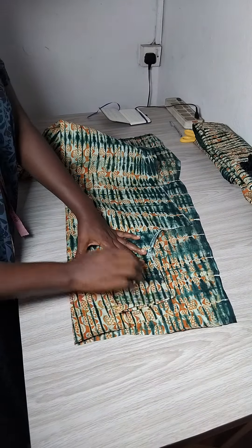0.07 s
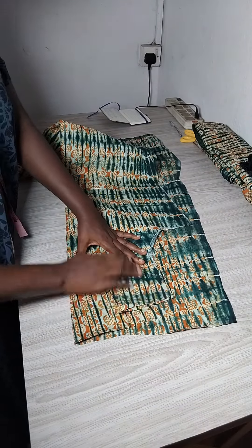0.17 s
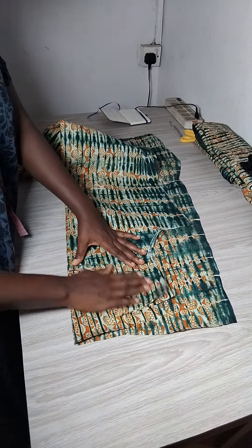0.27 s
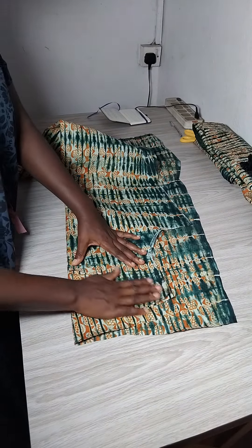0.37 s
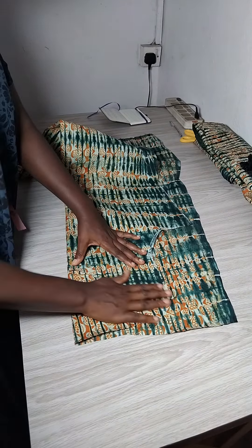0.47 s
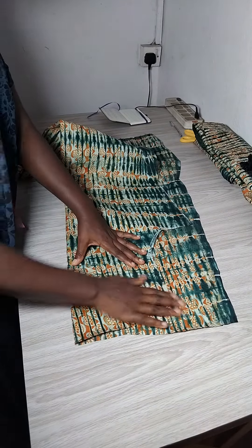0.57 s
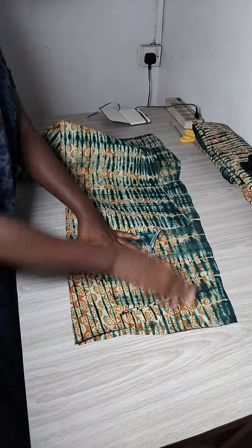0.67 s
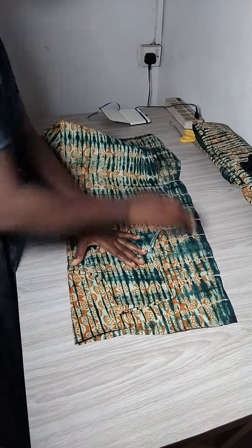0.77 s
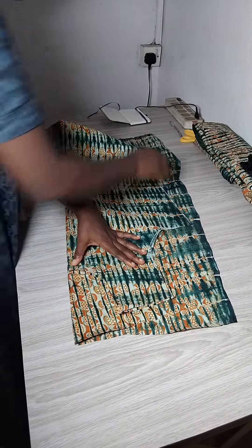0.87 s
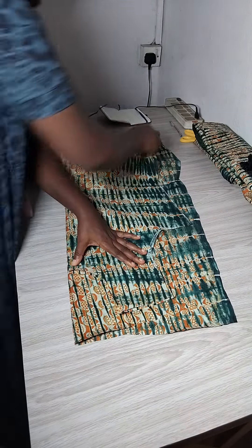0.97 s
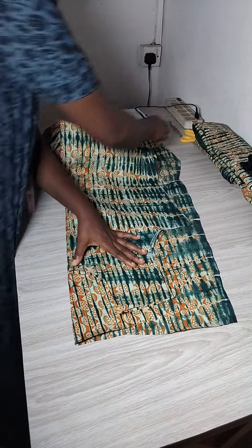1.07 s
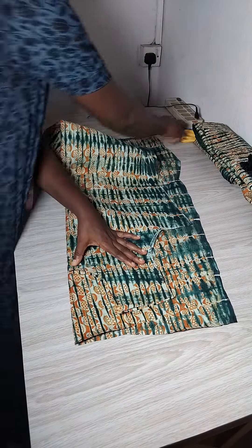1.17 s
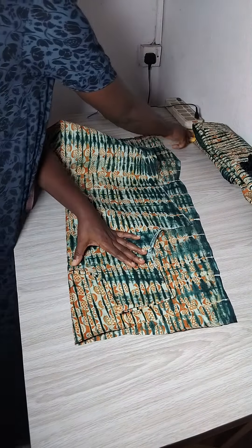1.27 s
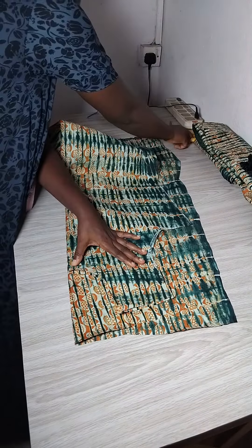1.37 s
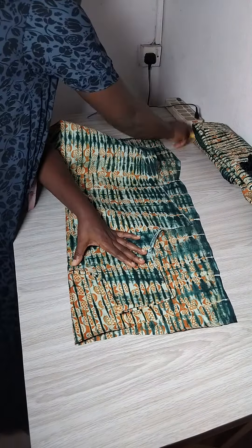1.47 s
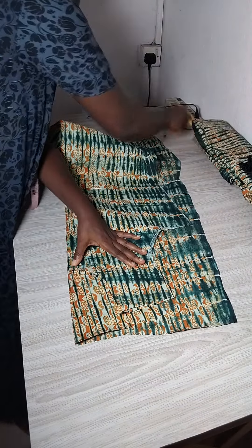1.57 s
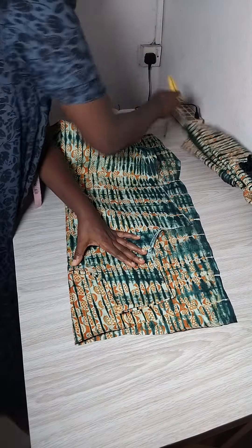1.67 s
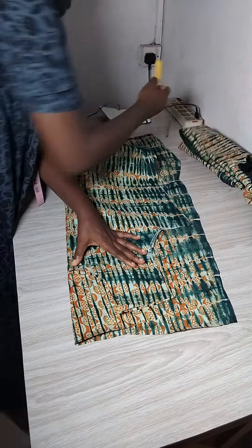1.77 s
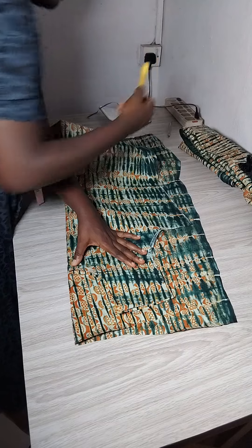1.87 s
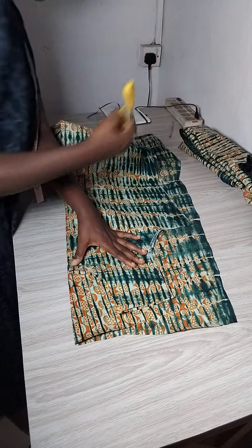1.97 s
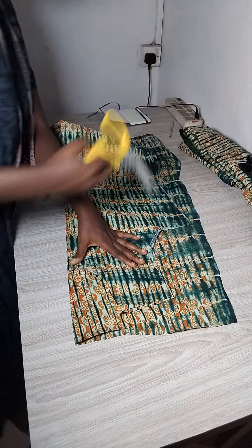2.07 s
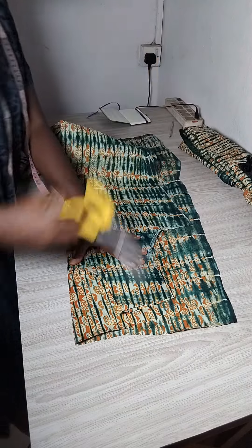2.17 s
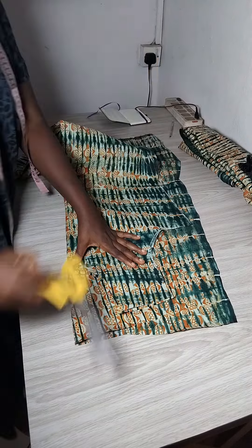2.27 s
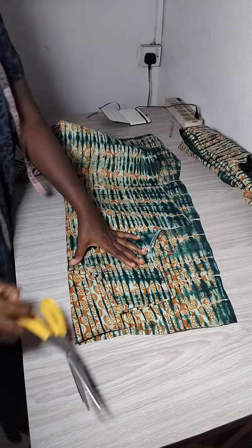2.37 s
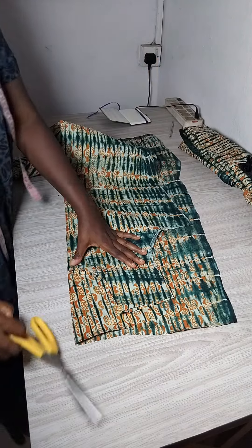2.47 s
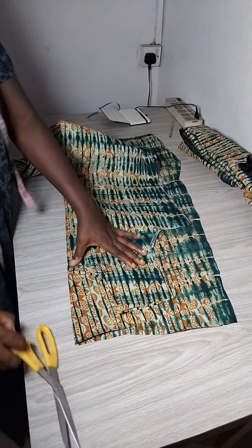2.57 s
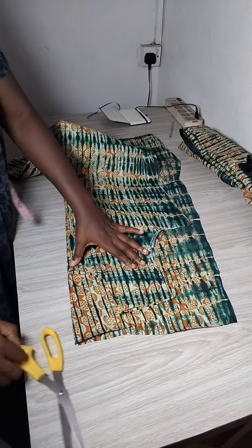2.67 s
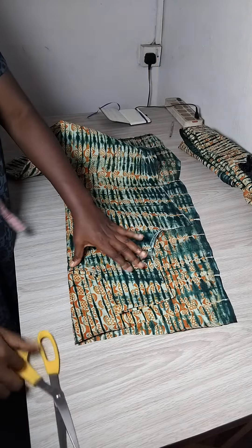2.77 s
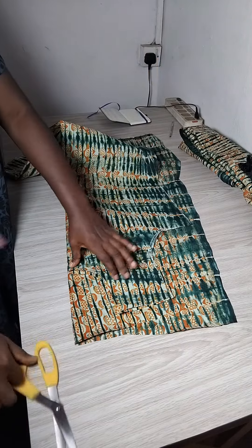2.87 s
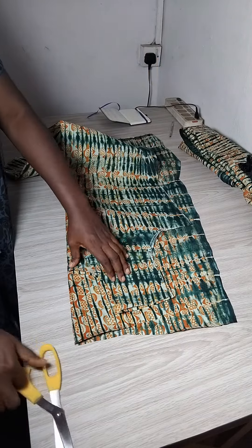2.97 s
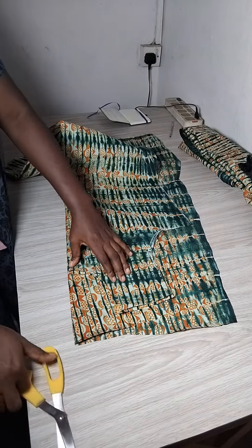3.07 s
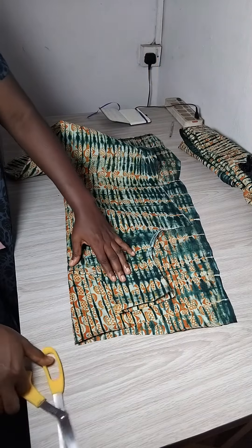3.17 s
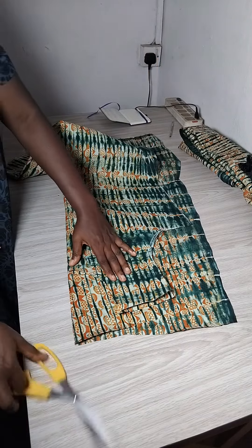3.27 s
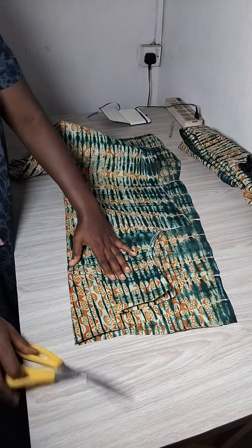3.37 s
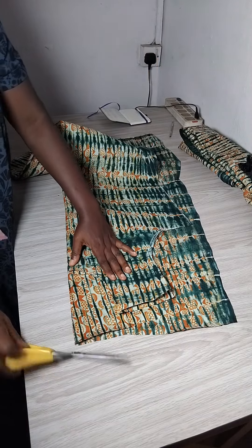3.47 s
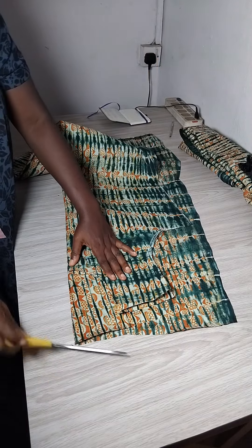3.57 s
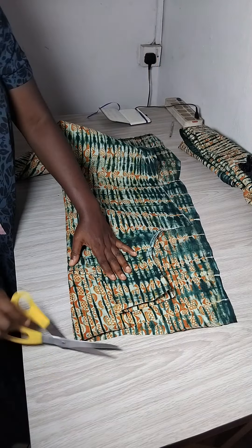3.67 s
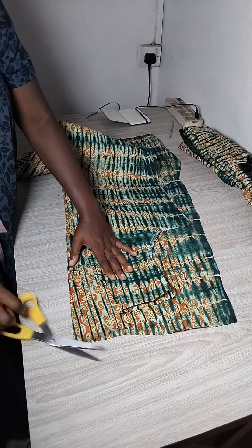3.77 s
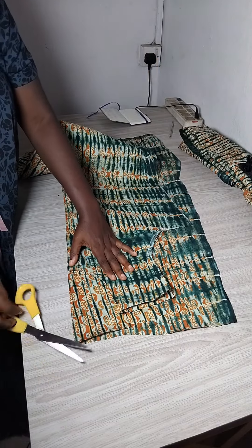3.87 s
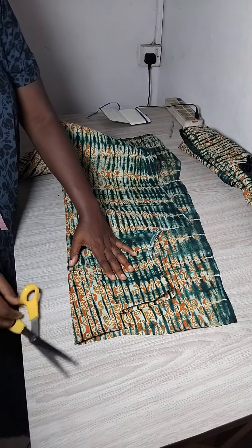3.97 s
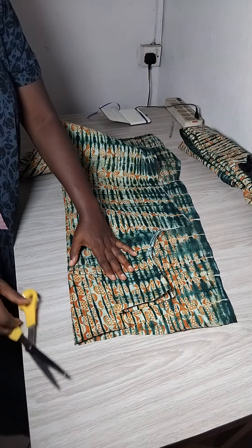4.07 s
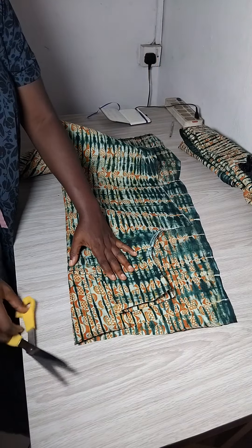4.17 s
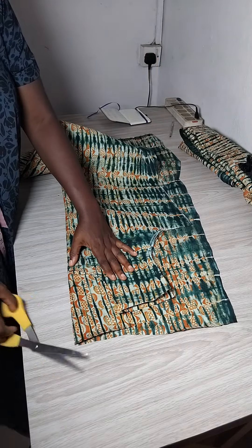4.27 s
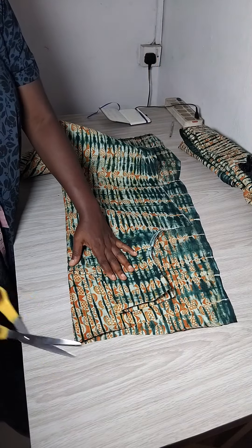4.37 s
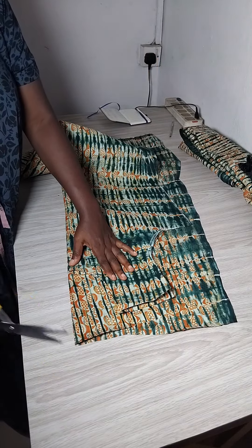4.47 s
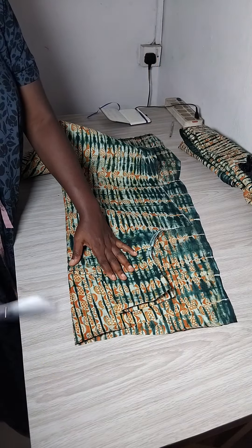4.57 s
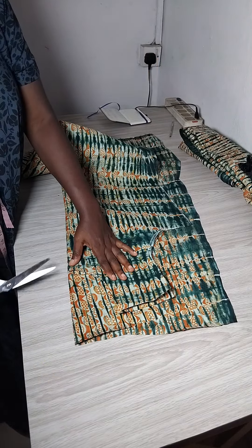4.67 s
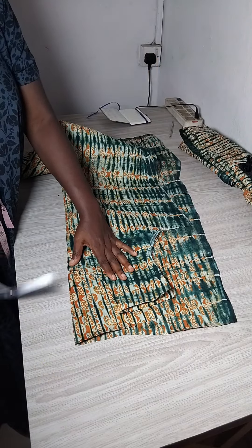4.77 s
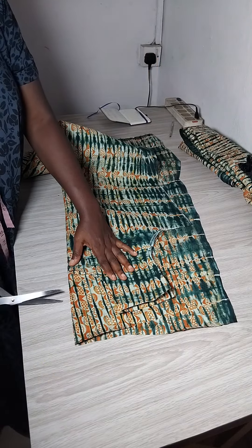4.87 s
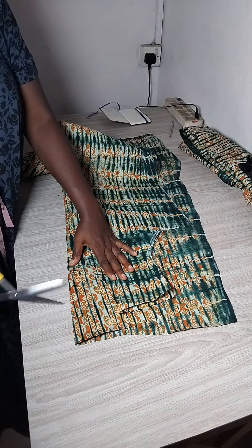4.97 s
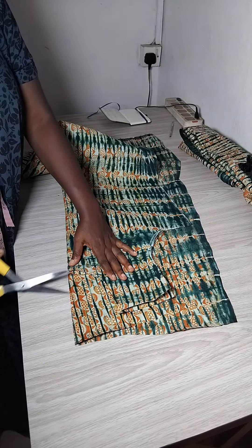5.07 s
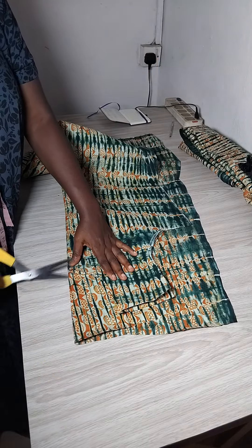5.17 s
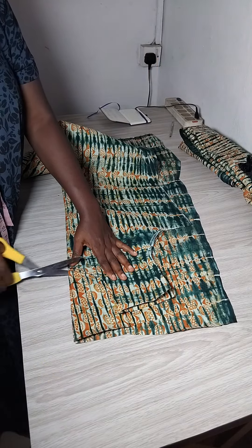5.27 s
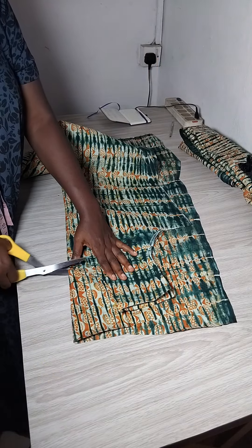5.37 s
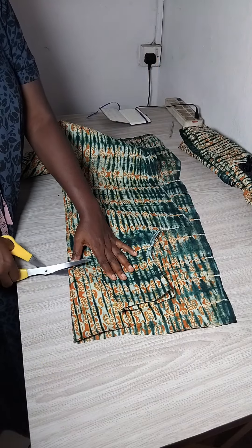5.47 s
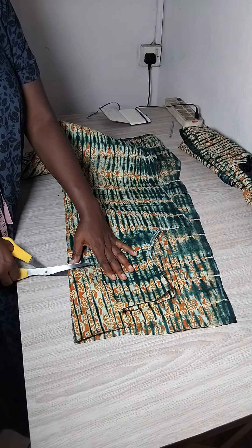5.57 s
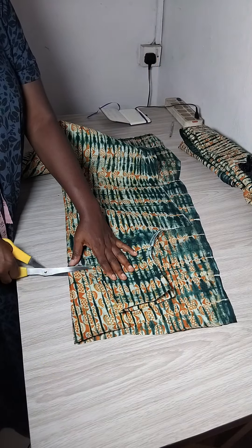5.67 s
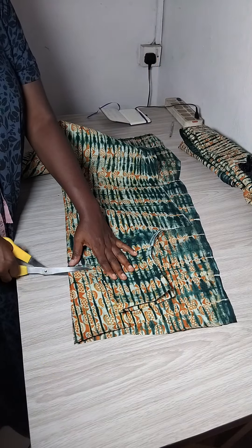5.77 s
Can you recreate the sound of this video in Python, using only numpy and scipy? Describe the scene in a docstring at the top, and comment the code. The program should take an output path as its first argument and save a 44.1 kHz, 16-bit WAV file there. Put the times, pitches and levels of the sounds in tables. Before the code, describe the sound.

A palm softly brushes cloth on a table, then large scissors are picked up with a light scrape, small knocks and a bright clink. After a quiet gap, steel blades snap loudly in irregular snips, with plastic handle clacks and thin metallic rasps. Small bare room, short boomy echo, low rumble; fairly close mono microphone.

```python
"""Small bare room: a hand smooths printed cloth on a table, picks up tailor's scissors, works them open and shut.
Steel blades click (contact noise + ringing modes) and rasp along each other (random slips driving modes).
Plastic handles knock at listed moments as the scissors are handled, opened and shut (thud + clack + low room mode).
The walls answer every snip with a short, boomy echo; cloth rubs as shaped noise over a low rumble."""
import sys
import numpy as np
from scipy import signal
from scipy.fft import rfft, irfft, next_fast_len
from scipy.io import wavfile
from scipy.ndimage import uniform_filter1d, map_coordinates

SR = 44100
rng = np.random.default_rng(int(sys.argv[2]) if len(sys.argv) > 2 else 0)


def log_audio(samples):
    """Write samples as a 16-bit WAV file to the path given in sys.argv[1]."""
    # one column per channel
    frames = np.atleast_2d(samples).T
    # limit to full scale, then quantise
    limited = np.clip(frames, -1, 1)
    pcm = np.round(limited * 32767).astype(np.int16)
    wavfile.write(sys.argv[1], SR, pcm)


N = 256662
NOW_S = np.arange(N) / SR
AGE_S = np.arange(SR // 2) / SR  # time since a blow


# sharp steel contacts: t/s, level/dB, blade ring/dB, brightness/dB
CLICKS = [(1.0256, -34, -20, -12), (2.527, -7, 7, 5.5), (2.5396, -14, -11, -6), (2.5681, -13, -9, -11),
          (2.8685, -19.5, -9, 3), (2.8761, -16, -5, 6), (2.8813, -15, -6, -4), (2.89, -12.5, -2.5, -1),
          (3.7484, -29.5, -1.5, -18), (3.8059, -12, -6, -14.5), (3.812, -20.5, -5, 13),
          (4.1618, -38.5, -21, 12), (4.3011, -29, -19, 2), (4.432, -20.5, -1, 3), (4.8709, -11.5, -7, 2.5),
          (5.6606, -34.5, -10, 14), (5.687, -41.5, -12, 6)]
# blades leaving the table: t/s, level/dB
LIFT = [(1.3803, -22.5)]
# modes of the crossed blades: f/Hz, level/dB
BLADE_MODES = [(1113, -1), (1745, -3), (1860, 2.5), (2509, -1), (3537, -2), (3731, -1), (3866, -5.5),
               (4172, -1), (4555, 0), (5120, -9), (5750, -7), (6150, -3.5), (7450, 1), (8550, -10.5),
               (9600, -6)]
# modes of the closed blades: f/Hz, level/dB
TIP_MODES = [(4215, -15), (4340, 1.5), (5700, -3.5), (6158, -14), (8296, -4)]
# colour of the pick-up clink: f/Hz, level/dB
CLINK_COLOUR = [(1000, -1), (3500, 0.5), (6000, 1.5), (10000, 6), (16000, 0)]


def clicks():
    """Blades clink on pick-up, then catch and snap as they cross: each blow excites damped modes."""
    out = np.zeros(N)
    for t_s, level_db, ring_db, bright_db in CLICKS:
        ringing = amp(ring_db + 0.5) * ring(BLADE_MODES, t60_s=0.069, scatter_db=1.0)
        add(out, t_s, amp(level_db + 14.5) * steel_hit(ringing, bright_db, wet_db=3.5))
    for t_s, level_db in LIFT:
        tip_tap = packet(fade(0.0036) * sine(6100))
        ringing = amp(-0.5) * ring(TIP_MODES, t60_s=0.043, scatter_db=1) + amp(-4.5) * tip_tap
        clink = packet(coloured(steel_hit(ringing, bright_db=3, wet_db=1.0), CLINK_COLOUR))
        add(out, t_s, amp(level_db + 22.5) * clink)
    return out


# spectrum of the steel crack: f/Hz, level/dB
CRACK_SPECTRUM = [(50, -25.5), (130, 4), (300, -2), (900, -2.5), (2000, -2), (3000, -6), (4000, -0.5),
                  (5500, -3.5), (8000, -3.5), (10000, -9.5), (12000, -17), (16000, -21)]


def steel_hit(ringing, bright_db, wet_db):
    """A crack of steel on steel plus the ring it leaves, answered by the walls."""
    crack = packet(coloured(contact(chatter=0.55, t60_s=0.009), CRACK_SPECTRUM))
    hit = coloured(crack + ringing, [(2500, 0), (12000, bright_db)])
    return packet(room(hit, wet_db))


# blade on blade: t/s, speeding up/s, slowing down/s, rasp/dB, edge hiss/dB, singing f/Hz, singing re rasp/dB
STROKES = [(2.55, 0.039, 0.11, -41, -60, 1900, -18), (2.67, 0.037, 0.065, -43.5, -72, 3780, -3),
           (2.741, 0.1, .02, -48.5, -55, 1910, -15), (3.189, 0.083, 0.071, -45.5, -48, 1850, -19.5),
           (3.26, 0.064, .11, -44.5, -39.5, 5240, -4), (3.39, 0.04, 0.13, -48.5, -52.5, 5960, -6),
           (3.58, .09, 0.15, -58.5, -66, 1880, -26), (3.74, 0.06, 0.053, -48.5, -67, 1840, -16),
           (4.30, 0.034, 0.15, -46.5, -63, 5860, -9), (4.432, 0.019, 0.082, -46, -60, 1850, -10),
           (4.46, .05, 0.068, -47, -58, 6400, -8.5), (4.97, 0.065, 0.13, -51, -60, 3480, -0.5),
           (5.1, 0.062, 0.11, -47, -54, 4360, -7.5), (5.613, 0.022, 0.027, -56.5, -68, 3300, -6),
           (5.65, 0.012, 0.045, -49, -48.5, 3270, 0)]
# spectrum of the rasp: f/Hz, level/dB
RASP_SPECTRUM = [(210, -27), (350, 4), (613, -11.5), (1070, -5), (1430, -14), (1790, -4), (2130, -21.5),
                 (2420, -6), (2890, -15.5), (3560, -7.5), (9440, -8.5), (14100, -36), (16000, -13.5)]
# spectrum of the edge hiss: f/Hz, level/dB
EDGE_SPECTRUM = [(5000, -26), (9000, 4.5), (11000, -0.5), (12500, -3), (14500, -4), (16000, 5)]


def strokes():
    """Edge grinds along edge: fine slips hiss and ring the blades, which damp each other as they touch."""
    out = np.zeros(N)
    slips = friction(rate_hz=1400, smooth=0.5)
    damped = ring([(hz, 0) for hz, _ in BLADE_MODES], t60_s=0.04, scatter_db=1)
    blade_ring = unit(signal.fftconvolve(slips, damped)[:N])
    rasp = unit(coloured(friction(rate_hz=1400, smooth=0.65), RASP_SPECTRUM))
    scrape = unit(rasp + amp(-9.0) * blade_ring)
    hiss = edge_hiss()
    for start_s, rise_s, fall_s, rasp_db, hiss_db, sing_hz, sing_db in STROKES:
        mode = fade(0.014) * (sine(sing_hz) + amp(-6) * sine(2.06 * sing_hz))
        flicker = amp(4 * wobble(20))  # singing comes and goes
        singing = unit(signal.fftconvolve(slips, mode)[:N] * flicker)
        grind = amp(rasp_db) * unit(scrape + amp(sing_db) * singing) + amp(hiss_db) * hiss
        out += glide(start_s, rise_s, fall_s, curve=1.66) * grind
    grip = amp(3.0 * wobble(70))  # blades press unevenly
    return room(grip * wandering(out, depth_db=2.5), wet_db=-1)


def edge_hiss():
    """Dense slips of a steel edge, shaped to high treble."""
    return unit(coloured(friction(rate_hz=4000, smooth=0.67), EDGE_SPECTRUM))


# handle knocks: t/s, level/dB, body f/Hz, clack f/Hz, clack/dB, boom/dB, brightness/dB
KNOCKS = [(1.025, -34.5, 512, 1005, 3.5, -22, 3), (1.276, -28.5, 260, 1106, -18, -2, -7.5),
          (1.380, -20.5, 492, 1150, -16, -13.5, 20.5), (1.659, -31.5, 443, 890, -3, 5.5, 2),
          (1.676, -27, 255, 930, -7, -10, 12.5), (1.988, -35.5, 463, 1125, -7, -18, 10),
          (2.003, -38.5, 377, 1130, -11, -22, 10), (2.529, -21.5, 549, 1203, 9, -2, -5),
          (2.553, -18.5, 481, 1110, -5, -2.5, 3), (2.572, -17.5, 296, 1730, -17, -23, 12),
          (2.873, -12.5, 489, 1020, -5.5, -11, 13), (2.887, -14.5, 380, 1525, -1.5, -25, 6.5),
          (2.911, -19, 352, 1470, -17, -32, 7), (2.927, -25, 370, 1670, -6, -29, 3),
          (3.128, -22, 343, 1500, -12.5, -12, 11), (3.806, -14, 455, 1110, 0.5, -15, 10.5),
          (3.819, -15, 368, 1350, -7, -10, 5), (4.163, -33.5, 510, 1600, -16, -24, 14),
          (4.288, -29, 580, 1100, -17, -15, 2), (4.301, -16.5, 561, 1550, -9.5, -3.5, 2.5),
          (4.432, -32.5, 270, 1760, 1, 5.5, 8), (4.870, -20.5, 325, 1870, -5, -7, 0),
          (5.622, -32, 382, 1064, 2.5, -20, -18), (5.657, -26.5, 226, 930, 7, -20, 10),
          (5.661, -22.5, 257, 1213, 7, -12, -6.5), (5.685, -32, 197, 1210, -7, -5.5, -13)]
# low modes of the room, rung by each knock: f/Hz, level/dB
ROOM_MODES = [(305, -2.5), (379, -4), (519, -8.5), (652, -1.5), (760, -15), (1005, -5), (1351, -36),
              (1486, -9)]
# spectrum of a dull thud or table rub: f/Hz, level/dB
THUD_SPECTRUM = [(100, -9), (215, -17), (300, -3), (400, 3.5), (750, -2), (1500, -15), (2500, -20),
                 (5000, -32), (12000, -33)]


def knocks():
    """Handles meet, cushioned by the fingers: body and clack follow the grip; the room's low mode booms."""
    out = np.zeros(N)
    boom = packet(fade(0.37) * swell(0.0022) * sine(126))
    # keeps the cushioned knock free of rumble below about 110 Hz
    low_cut = signal.butter(2, 110, "high", fs=SR, output="sos")
    for t_s, level_db, body_hz, clack_hz, clack_db, boom_db, bright_db in KNOCKS:
        thud = packet(coloured(contact(chatter=1.23, t60_s=0.026), THUD_SPECTRUM))
        low_modes = amp(-11.0) * ring(ROOM_MODES, t60_s=0.077, scatter_db=0.0)
        gripped = amp(0.5) * resonance(body_hz, t60_s=0.028)
        body = packet(thud + low_modes + gripped)
        clack = packet(resonance(clack_hz, t60_s=0.0081) + amp(-15.0) * resonance(clack_hz, t60_s=0.027))
        tilt = [(500, 0), (3500, bright_db), (12000, bright_db - 14.5)]
        hit = coloured(body + amp(clack_db) * clack, tilt)
        hit = signal.sosfilt(low_cut, hit * swell(0.0048))  # swell: finger cushioning
        knock = packet(room(hit, wet_db=2.5)) + amp(boom_db - 3.5) * boom
        add(out, t_s, amp(level_db + 20) * knock)
    return out


def resonance(hz, t60_s):
    """One mode of the plastic, driven by a chattering contact."""
    mode = fade(t60_s) * sine(hz)
    return packet(signal.fftconvolve(contact(chatter=0.83, t60_s=0.011), mode)[:len(AGE_S)])


# scissors over the table: t/s, speeding up/s, slowing down/s, scrape/dB, edge hiss/dB
DRAGS = [(1.325, 0.049, 0.035, -46, -68), (1.45, 0.094, 0.076, -45, -66), (1.5, 0.065, 0.26, -56.5, -51.5)]


def drag():
    """Scissors slide over the table top as the hand takes them: slip noise scaled by speed."""
    scrape = unit(coloured(friction(rate_hz=3300, smooth=1.0), RASP_SPECTRUM))
    hiss = edge_hiss()
    out = np.zeros(N)
    for start_s, rise_s, fall_s, scrape_db, hiss_db in DRAGS:
        slide = amp(scrape_db) * scrape + amp(hiss_db) * hiss
        out += glide(start_s, rise_s, fall_s, curve=2.65) * slide
    return room(amp(0.6 * wobble(52.2)) * wandering(out, depth_db=2.0), wet_db=-3)


# palm and sleeve on cloth: t/s, speeding up/s, slowing down/s, weave/dB, table rub/dB
CLOTH = [(.13, 0.36, .26, -56, -63), (.55, 0.59, 0.55, -65.5, -71), (1.65, 0.41, .52, -64, -53),
         (2.93, 0.13, 0.72, -59.5, -62), (3.2, .05, 0.071, -52.5, -47.5), (2.24, 0.13, 0.049, -83, -69.5)]
# spectrum of the rubbed weave: f/Hz, level/dB
WEAVE_SPECTRUM = [(400, 3), (1500, -12), (3000, -4.5), (6000, -5.5), (9500, -4), (12000, -14), (16000, -21)]
# hand bumping the table: t/s, level/dB
BUMPS = [(0.232, -34.5), (1.275, -38.5), (5.663, -37)]


def cloth():
    """Palm smooths the fabric, sleeve brushes on the reach; the table rubs and thumps (76 Hz) under a hand."""
    weave = unit(coloured(friction(rate_hz=7300, smooth=1), WEAVE_SPECTRUM))
    rub = unit(coloured(friction(rate_hz=910, smooth=0.78), THUD_SPECTRUM))
    out = np.zeros(N)
    for start_s, rise_s, fall_s, weave_db, rub_db in CLOTH:
        out += glide(start_s, rise_s, fall_s, curve=2.0) * (amp(weave_db) * weave + amp(rub_db) * rub)
    out *= amp(1.2 * wobble(24))  # hand pressure
    for t_s, level_db in BUMPS:
        add(out, t_s, amp(level_db + 4.0) * fade(0.088) * swell(0.0018) * sine(76))
    return out


# walls' decay: f/Hz, t60/s
WALLS = [(120, 0.76), (300, 0.21), (700, 0.18), (1900, 0.23), (5000, 0.21), (13000, 0.15)]


def room(x, wet_db):
    """Direct sound plus walls: single echoes thicken into a tail, each frequency dying at its own speed."""
    density = np.minimum(0.04 + (AGE_S / 0.05) ** 2, 1)
    echoes = (rng.random(len(AGE_S)) < density) * rng.standard_normal(len(AGE_S)) / np.sqrt(density)
    hz, t_s, z = signal.stft(echoes, SR, nperseg=256)
    decay = np.exp(-np.log(1000) * t_s / along(WALLS, hz)[:, None])
    tail = signal.istft(z * decay, SR, nperseg=256)[1][:len(AGE_S)]
    echo = amp(wet_db) * packet(tail * swell(0.00033))
    echo[0] += 1  # direct sound
    return signal.fftconvolve(x, packet(echo))[:len(x)]


# spectrum of the room rumble: f/Hz, level/dB
RUMBLE_SPECTRUM = [(20, -3), (81, -12), (119, -4.5), (169, -10), (226, -13), (294, -8.5), (371, -20),
                   (405, -14.5), (610, -16.5), (665, -19), (1160, -24), (2860, -37), (6290, -40),
                   (16000, -51)]


def background():
    """The room's low, slightly restless rumble: shaped noise with a wobbling level."""
    rumble = unit(coloured(rng.standard_normal(N), RUMBLE_SPECTRUM))
    return amp(-50 + 0.69 * wobble(11)) * rumble


def contact(chatter, t60_s):
    """One push followed by a brief chatter of the touching parts."""
    force = chatter * packet(rng.standard_normal(len(AGE_S)) * fade(t60_s))
    force[0] -= 1
    return force


def ring(modes, t60_s, scatter_db):
    """Damped modes, struck at new strengths each time; t60_s holds at 1 kHz, higher modes die sooner."""
    out = np.zeros(len(AGE_S))
    for hz, db in modes:
        strength = amp(db + scatter_db * rng.standard_normal()) * rng.choice([-1, 1])
        out += strength * fade(t60_s * np.sqrt(1000 / hz)) * sine(hz)
    return packet(out)


def friction(rate_hz, smooth):
    """Tiny slips of uneven size at a mean rate, over an even hiss."""
    slips = (rng.random(N) < rate_hz / SR) * rng.standard_normal(N)
    return unit(unit(slips) + smooth * rng.standard_normal(N))


def glide(start_s, rise_s, fall_s, curve):
    """Gain of one slide: speeds up from rest, slows to a stop, sounds as a power of its speed."""
    progress = np.interp(NOW_S - start_s, np.cumsum([0, rise_s, fall_s]), [0, 0.5, 1])
    return np.abs(np.sin(np.pi * progress)) ** curve


def wandering(x, depth_db):
    """As the contact point travels along the edge, the favoured frequencies keep changing."""
    z = signal.stft(x, nperseg=512)[2]
    field = rng.standard_normal(z.shape)
    for axis in (0, 1):
        field = uniform_filter1d(field, size=6, axis=axis)
    return signal.istft(z * amp(depth_db * unit(field)), nperseg=512)[1][:len(x)]


def wobble(knots_hz):
    """Smooth random curve through knots at the given rate."""
    return map_coordinates(rng.standard_normal(4096), [NOW_S * knots_hz], mode="wrap")


def sine(hz):
    """Steady oscillation from the moment of a blow."""
    return np.sin(2 * np.pi * hz * AGE_S)


def fade(t60_s):
    """Exponential decay after a blow, -60 dB at t60_s."""
    return np.exp(-np.log(1000) * AGE_S / max(t60_s, 1e-4))


def swell(tau_s):
    """Exponential onset after a blow."""
    return 1 - np.exp(-AGE_S / tau_s)


def coloured(x, spectrum):
    """Causal (minimum-phase) filter with the given spectrum, via the folded cepstrum."""
    size = 4096
    cepstrum = irfft(np.log(amp(along(spectrum, np.fft.rfftfreq(size, 1 / SR)))))
    cepstrum[1:size // 2] *= 2
    cepstrum[size // 2 + 1:] = 0
    return signal.fftconvolve(x, irfft(np.exp(rfft(cepstrum))))[:len(x)]


def filtered(x, response):
    """Zero-phase filter: x times a response of frequency."""
    size = next_fast_len(len(x) + SR // 4)
    return irfft(rfft(x, size) * response(np.fft.rfftfreq(size, 1 / SR)), size)[:len(x)]


def along(points, hz):
    """Interpolate (f/Hz, value) points on a log axis."""
    f, v = np.transpose(points)
    return np.interp(np.log(hz + 1), np.log(f + 1), v)


def amp(db):
    """Decibels to gain."""
    return 10 ** (np.asarray(db) / 20)


def unit(x):
    """Scale to rms 1."""
    return x / np.sqrt(np.mean(x ** 2) + 1e-20)


def packet(x):
    """Scale to energy 1."""
    return x / (np.linalg.norm(x) + 1e-20)


def add(track, t_s, sound):
    """Mix a sound in at time t_s."""
    part = track[max(round(t_s * SR), 0):][:len(sound)]
    part += sound[:len(part)]


def scene():
    """Mono sum of all sources."""
    return (clicks() + strokes() + knocks() + drag() + cloth() + background())[None]


def record(dry):
    """The treble has one narrow dip and ends at a steep band limit."""
    def response(hz):
        """Gaussian dip times a 200 Hz wide linear cutoff."""
        dip = amp(-9 * np.exp(-((hz - 4010) / 55) ** 2))
        return dip * np.clip((15900 - hz) / 200 + 0.5, 0, 1)
    return filtered(dry[0], response)[None]


dry = scene()
out = record(dry)
log_audio(out)
```